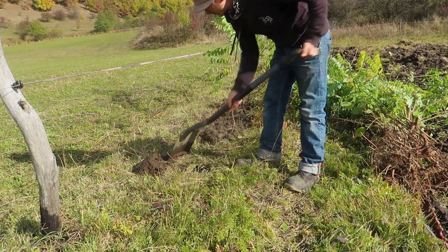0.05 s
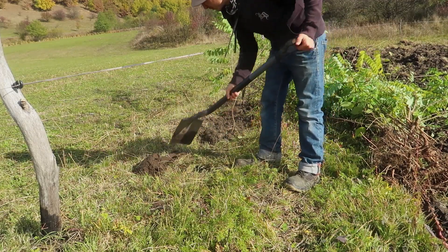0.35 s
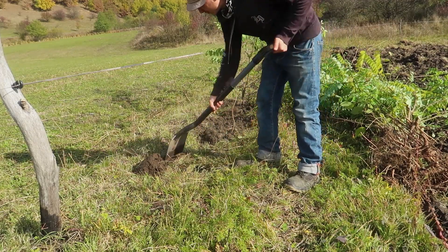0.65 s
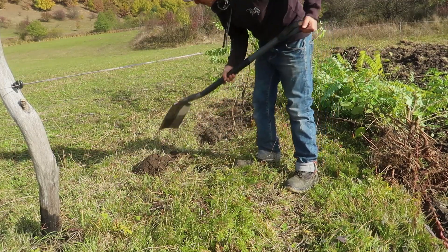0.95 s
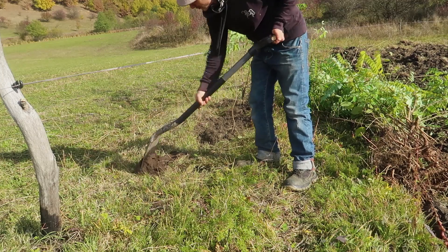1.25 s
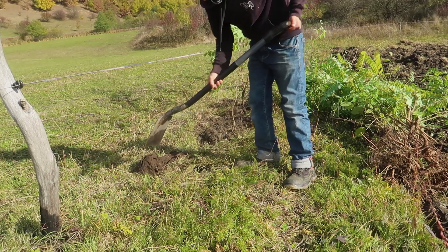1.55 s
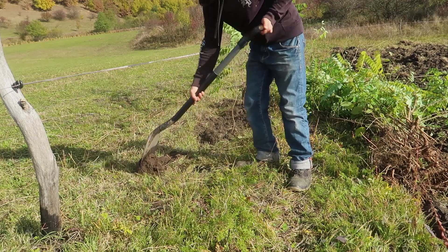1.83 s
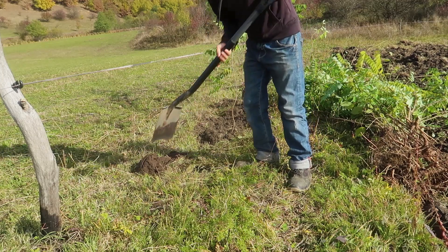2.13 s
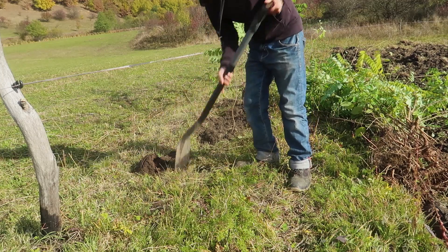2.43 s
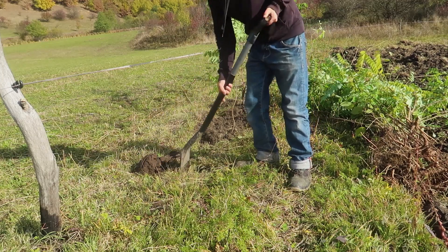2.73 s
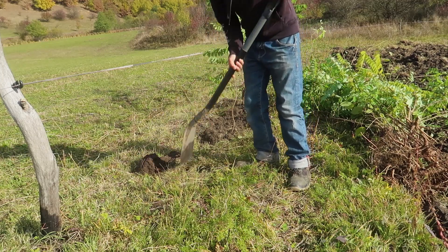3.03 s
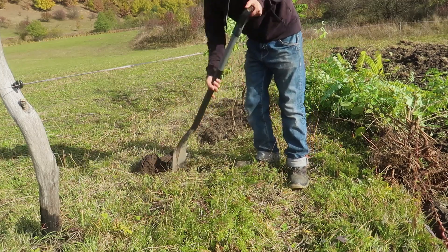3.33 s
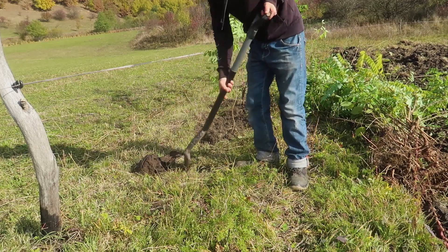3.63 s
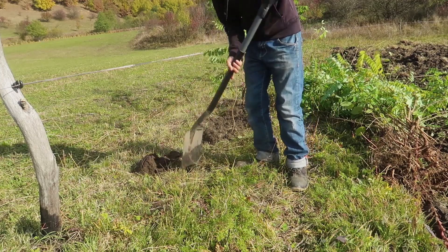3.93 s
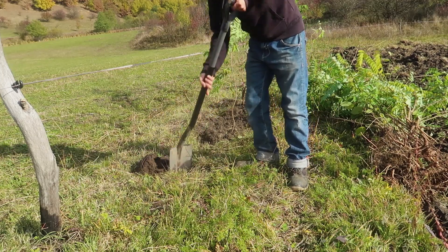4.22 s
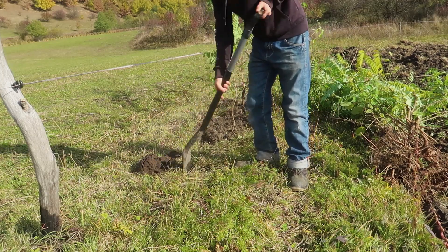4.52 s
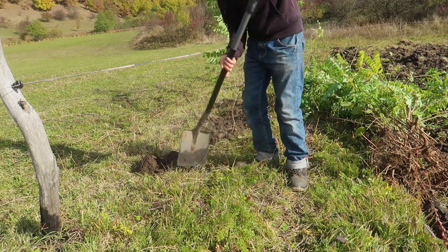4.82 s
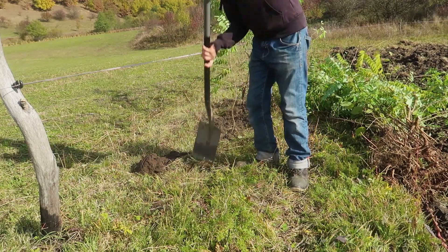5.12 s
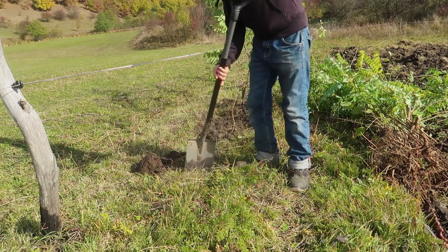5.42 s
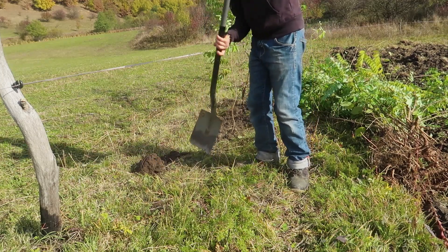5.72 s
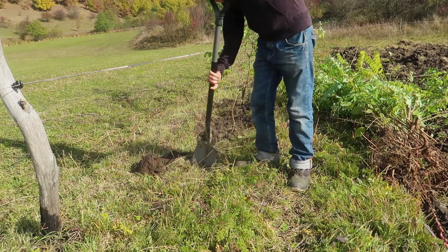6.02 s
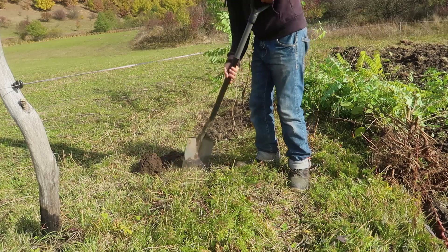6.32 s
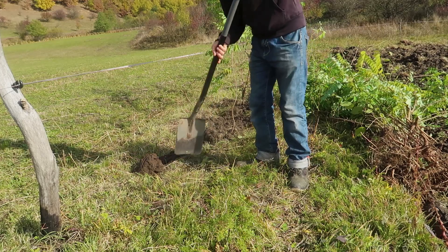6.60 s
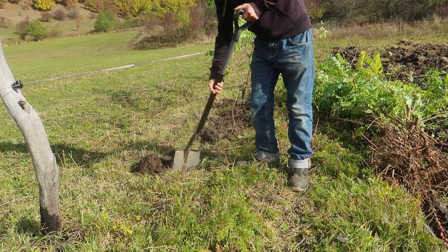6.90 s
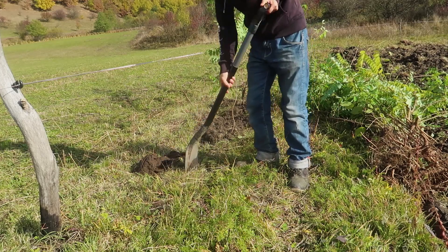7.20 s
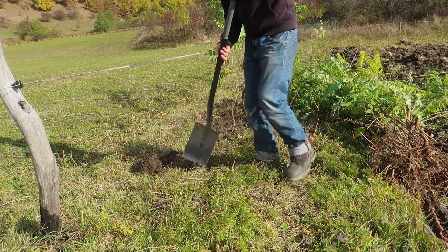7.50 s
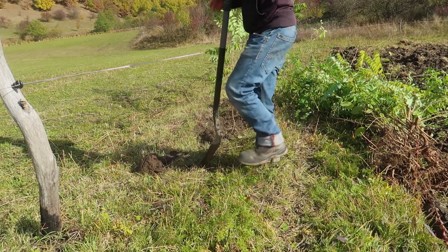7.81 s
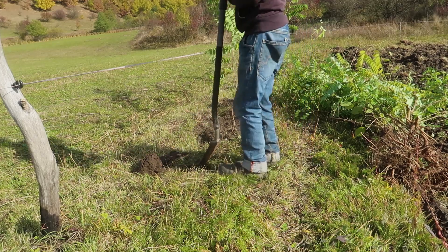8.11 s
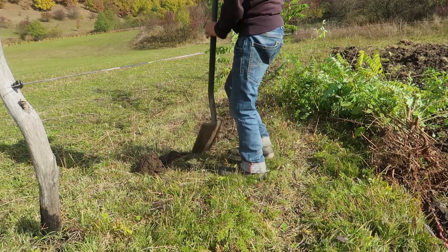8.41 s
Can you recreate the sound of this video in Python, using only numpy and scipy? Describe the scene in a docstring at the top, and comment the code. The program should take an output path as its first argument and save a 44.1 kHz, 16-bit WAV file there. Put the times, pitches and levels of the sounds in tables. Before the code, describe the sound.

A steel spade digs in an open field, a few metres away and near the centre, with almost no echo. Four short chops hit bare soil at about 0.2, 0.7, 1.3 and 1.9 seconds, each a gritty crunch with a dull thud and shaft knock, the first and third with sharp stone clicks. The blade scrapes and rings faintly as it withdraws. Slightly softer-edged cuts crunch into turf at about 2.6, 3.4, 4.3, 5.3, 6.0 and 6.8 seconds. Between them, roots and grass crackle quietly and stones tick on the steel, with one sharp clack near 4.7 seconds and a scatter of clicks just after 6. Two lighter cuts come at 7.8 and 8.1 seconds, followed by a small knock and faint tearing. Throughout, light wind rumbles on the microphone, gusting occasionally from 3 seconds, over a steady hiss and faint low hum.

```python
"""A steel spade chops into turf in an open field, a few metres from the microphone.
Each stroke thuds into the sod, knocks the shaft and crunches through roots and grit in tiny fractures;
stones click on the blade, which rings faintly as it is drawn out. The ground scatters a short tail.
Light wind rumbles on the microphone over a steady hiss and a faint hum."""
import sys
import numpy as np
from scipy import signal
from scipy.fft import rfft, irfft
from scipy.io import wavfile

SR = 44100
rng = np.random.default_rng(int(sys.argv[2]) if len(sys.argv) > 2 else 0)


def persist_wave(psi):
    """Save psi, clipped to +-1, as 16-bit WAV."""
    counts = np.round(np.clip(psi, -1, 1) * 32767).astype(np.int16)
    wavfile.write(sys.argv[1], SR, np.atleast_2d(counts).T)


N = 377055
SHORT = np.arange(8192) / SR   # time axis of one impulse response
HIT_GAIN = np.sqrt(SR / 200)   # turns an energy of one into an rms of one over 5 ms

# chops into bare soil: t/s, crunch/dB, hold/s, fall/s, thud/dB, thud f/Hz, shaft knock/dB
CHOPS = [(.178, -32.5, .025, 0.037, -23.5, 250, -28), (0.728, -42, .045, 0.015, -24, 176, -30),
         (1.326, -33.5, 0.0024, 0.071, -32, 283, -21), (1.854, -40, 0.026, 0.084, -32.5, 222, -32)]
# cuts into turf: t/s, crunch/dB, hold/s, fall/s, thud/dB
CUTS = [(2.568, -39.5, 0.038, 0.033, -41), (3.429, -38, 0.012, 0.044, -36),
        (4.335, -38, 0.0033, 0.062, -38.5), (5.281, -34, 0.018, 0.022, -33),
        (6.033, -35.5, 0.021, 0.039, -33), (6.827, -36, 0.026, .035, -26), (7.819, -46, .005, 0.036, -54),
        (8.078, -46, 0.0082, 0.097, -43.5)]
# roots and grass giving way: t/s, level/dB, length/s, tilt/(dB per octave)
TEARS = [(.77, -40, 0.026, -1), (2.82, -63, .36, 0), (3.47, -52, .08, 2), (3.67, -61, 0.31, 1),
         (4.53, -54.5, 0.31, -1.5), (4.8, -64, 0.26, -1), (5.43, -53, 0.25, -2.5),
         (5.66, -60.5, 0.13, -3.5), (6.21, -52.5, .27, -1.5), (7.08, -53, 0.12, -3.5),
         (8.11, -56, 0.29, -7.5), (8.25, -62.5, 0.39, 3)]
TEAR_SHAPE = (.2, .46, .46)   # proportions of rise, hold and fall
# modes of the blade held by soil: f/Hz, relative level/dB, t60/s
BURIED_BLADE = [(820, 4.5, 0.013), (960, 10, 0.0034), (1153, 2, 0.033), (1510, 3.5, 0.05),
                (2284, -5, 0.067), (2400, -0.5, 0.037), (2653, 4, 0.028), (2936, 6.5, 0.026),
                (3725, -1.5, 0.064), (4150, 0, 0.034), (4700, -4.5, 0.023), (5784, 1, 0.021),
                (7040, -14, 0.028)]


def spade_crunches():
    """The blade drives in: sudden in bare soil, swelling as it parts turf, thinner in a light cut."""
    # spectrum of crunching soil: f/Hz, relative level/dB
    soil_spectrum = [(50, 15.5), (130, 11), (300, 9), (600, 4), (900, 0), (1400, -2), (2000, -3),
                     (3000, -2.5), (4500, -6.5), (6500, -10.5), (10000, -16.5), (13000, -25.5),
                     (15500, -47)]
    chop_rise_s, chop_tilt_db, cut_rise_s = .005, 0.95, .029
    firm_cut_db, thinning = -33.5, 0.23   # dB per octave of tilt for each dB below a firm cut
    chops = [(s, db, chop_rise_s, hold, fall, chop_tilt_db) for s, db, hold, fall, *_ in CHOPS]
    cuts = [(s, db, cut_rise_s, hold, fall, thinning * (firm_cut_db - db))
            for s, db, hold, fall, _ in CUTS]
    return strokes(chops + cuts, soil_spectrum, BURIED_BLADE, ring_db=-9, detune=0.0098, curve=1.04,
                   per_s=3800, spread_db=2.0, smooth_db=-5.0, slips_per_s=370, slip_db=7.5)


def impacts():
    """Chops, cuts and jolts as blows: t/s, thud/dB, thud f/Hz, knock/dB, knock tilt/(dB per octave)."""
    # the buried spade catches and its shaft jolts: t/s, knock/dB
    catches = [(0.1969, -19.5), (3.517, -46), (6.842, -35), (6.983, -43), (8.243, -42.5)]
    turf_hz, jolt_hz, jolt_tilt_db = 148, 235, -1.5
    firm_knock_db, brightening = -29, 0.8   # dB per octave of tilt for each dB above a firm knock
    stops = [(s, thud_db, hz, knock_db) for s, *_, thud_db, hz, knock_db in CHOPS]
    stops += [(s, thud_db, turf_hz, thud_db - 4) for s, *_, thud_db in CUTS]
    jolts = [(s, knock_db - 21, jolt_hz, knock_db, jolt_tilt_db) for s, knock_db in catches]
    return [(*stop, brightening * (stop[-1] - firm_knock_db)) for stop in stops] + jolts


def spade_blows(thud_cycles, push_s, contact_s):
    """The sod takes each blow as a thud that dies by 60 dB in thud_cycles, while the shaft knocks."""
    # modes of the shaft: f/Hz, relative level/dB, t60/s
    shaft_modes = [(301, -2, 0.028), (459, -1, 0.042), (536, -3, 0.043), (720, -5, 0.038),
                   (1210, -2.5, 0.012), (1447, -4, 0.018), (2270, -12, 0.022), (3380, -13, 0.024)]
    out = np.zeros(N)
    contact = SHORT * np.exp(-SHORT / contact_s)
    push = 1 - np.exp(-SHORT / push_s)
    for s, thud_db, hz, knock_db, tilt_db in impacts():
        thud = np.sin(2 * np.pi * hz * SHORT) * decay(thud_cycles / hz) * push
        knock = through(ringing(shaft_modes, tilt_db, vary_db=1.0, detune=0.0016), contact)
        add(out, s, HIT_GAIN * (from_db(thud_db) * unit(thud) + from_db(knock_db) * unit(knock)))
    return out


def root_tears():
    """Roots and grass snap as the blade is levered or trodden."""
    # spectrum of snapping roots: f/Hz, relative level/dB
    snap_spectrum = [(100, -22), (350, 7.5), (800, -6.5), (1500, -1), (3200, 2), (6000, -5), (10000, -12),
                     (15500, -30)]
    tears = shaped(TEARS, TEAR_SHAPE)
    return strokes(tears, snap_spectrum, BURIED_BLADE, ring_db=-11, detune=0.028, curve=1.4,
                   per_s=550, spread_db=5.5, smooth_db=-0.5, slips_per_s=240, slip_db=3.5)


def blade_draws():
    """Drawn out, the blade skims the soil and rings freely."""
    # skims of the blade: t/s, level/dB, length/s, tilt/(dB per octave)
    skims = [(.351, -46, .05, -3.5), (.397, -52, 0.057, -6), (.93, -55.5, 0.085, -7),
             (1.565, -54.5, 0.098, -2.5), (2.085, -50.5, .17, -2), (4.955, -57, 0.14, -5.5),
             (6.42, -57.5, .12, -4), (7.505, -55, .18, -2), (7.822, -38.5, .016, 1.5)]
    # spectrum of steel sliding on soil: f/Hz, relative level/dB
    slide_spectrum = [(300, -9), (1200, -4.5), (2500, 2), (5000, 3.5), (9000, -3), (15500, -22)]
    # modes of the free blade: f/Hz, relative level/dB, t60/s
    free_blade = [(1425, 7.5, 0.039), (1795, -2, 0.29), (1980, -7, 0.12), (2260, -5, 0.076),
                  (2560, 11, 0.091), (2800, -5, 0.029), (2860, -26, 0.06), (3160, 1.5, 0.078),
                  (3750, 3, 0.027), (3980, 4, 0.026), (4600, -23, .04), (5230, -5, 0.041)]
    draws = shaped(skims, (.38, .04, .58))
    return strokes(draws, slide_spectrum, free_blade, ring_db=2, detune=0.0075, curve=2.46,
                   per_s=2800, spread_db=4.5, smooth_db=5.5, slips_per_s=180, slip_db=4.5)


def stone_clicks(skid_s, ring_db, ring_growth):
    """A stone skids over the steel for a moment; the harder the hit, the more the blade rings."""
    # stones striking the blade: t/s, level/dB, tilt/(dB per octave)
    stones = [(.178, -29, -2), (.189, -30.5, 4), (.197, -28.5, -1), (.7282, -37, -0.5), (.781, -43, -1),
              (1.324, -28, -1.5), (3.4143, -42.5, 11.5), (3.4393, -38.5, 3.5), (3.8233, -51.5, 5),
              (4.3347, -34.5, -7), (4.5001, -44, 1.5), (4.5626, -45, 0.5), (4.5871, -40, 0.5),
              (4.6515, -22, .5), (4.6735, -34.5, 0), (5.4965, -36.5, 1.5), (6.02, -41.5, 7),
              (6.042, -31, -3.5), (6.162, -46.5, 1), (6.174, -44, 1.5), (6.2157, -47, 2), (6.227, -44, 2),
              (6.316, -40, 1), (6.33, -41.5, -0.5), (6.396, -48.5, 3), (6.9826, -43.5, 0),
              (7.0827, -43, -3.5), (7.823, -43, 6)]
    # spectrum of a stone's crack: f/Hz, relative level/dB
    crack_spectrum = [(100, -19), (400, -4), (900, 6.5), (1400, 3.5), (2200, 3.5), (4200, -4), (6800, -7),
                      (9500, -18), (15500, -35)]
    out = np.zeros(N)
    hardest_db = max(db for _, db, _ in stones)
    for s, level_db, tilt_db in stones + grit(count=2, above_tear_db=4, top_db=-48.5, spread_db=2.5):
        ring = ringing(BURIED_BLADE, tilt_db, vary_db=3.5, detune=0.011)
        ring_gain = from_db(ring_db + ring_growth * (level_db - hardest_db))
        response = ring_gain * ring + colour(crack_spectrum, tilt_db)
        click = unit(signal.fftconvolve(skid(skid_s), response))
        add(out, s, HIT_GAIN * from_db(level_db) * click)
    return out


def grit(count, above_tear_db, top_db, spread_db):
    """Each tear flicks grains at the blade at random moments: t/s, level/dB, tilt/(dB per octave)."""
    ticks = []
    for s, tear_db, _, hold, _, tilt_db in shaped(TEARS, TEAR_SHAPE):
        mean_db = min(tear_db + above_tear_db, top_db)
        for _ in range(count):
            ticks.append((s + hold * rng.random(), mean_db + spread_db * rng.standard_normal(), tilt_db))
    return ticks


def skid(decay_s):
    """A brief chattering contact that excites all pitches about evenly; energy one."""
    chatter = rng.standard_normal(len(SHORT)) * np.exp(-SHORT / decay_s)
    flat_spectrum = np.exp(1j * np.angle(rfft(chatter)))
    return unit(irfft(flat_spectrum)[:len(SHORT) // 2])


def strokes(moves, spectrum, modes, ring_db, detune, curve, **texture):
    """Grains swell and fade with the blade's travel, sounding in the soil and ringing the steel."""
    out = np.zeros(N)
    ring_gain = from_db(ring_db)   # steel against soil
    for s, level_db, rise, hold, fall, tilt_db in moves:
        t = np.arange(-2 * rise, hold + 2 * fall, 1 / SR)
        away = np.maximum(-t / rise, 0) + np.maximum((t - hold) / fall, 0)
        envelope = from_db(level_db - 20 * away ** curve)   # 20 dB down after one rise or fall
        force = envelope * np.resize(grains(SR // 2, **texture), len(t))
        on_steel = force * np.resize(rng.choice([-1, 1], SR // 2), len(t))   # pushes on either face
        soil = signal.fftconvolve(force, colour(spectrum, tilt_db))
        steel = signal.fftconvolve(on_steel, ringing(modes, tilt_db, vary_db=3.5, detune=detune))
        add(out, s - 2 * rise, (soil + ring_gain * steel) / np.hypot(1, ring_gain))
    return out


def grains(size, per_s, spread_db, smooth_db, slips_per_s, slip_db):
    """Tiny fractures over smooth friction, bunched as the blade sticks and slips; rms one."""
    strength = from_db(spread_db * np.minimum(rng.exponential(1, size), 3))
    snaps = (rng.random(size) < per_s / SR) * strength * rng.choice([-1, 1], size)
    slips = np.interp(np.arange(size) * slips_per_s / SR, np.arange(size), rng.uniform(-0.4, 1, size))
    friction = from_db(smooth_db) * unit(rng.standard_normal(size))
    return np.sqrt(size) * unit((unit(snaps) + friction) * from_db(slip_db * slips))


def ringing(modes, tilt_db, vary_db, detune):
    """Decaying modes; strengths vary with the point of contact, pitches with the soil's grip."""
    hz, level_db, t60 = np.transpose(modes)[:, :, None]
    hz = hz * np.exp(detune * rng.standard_normal(hz.shape))
    level_db = level_db + tilt_db * np.log2(hz) + vary_db * rng.standard_normal(hz.shape)
    signs = (-1) ** np.arange(len(hz))[:, None]
    partials = signs * from_db(level_db) * decay(t60) * np.sin(2 * np.pi * hz * SHORT)
    return unit(np.sum(partials, axis=0))


def open_field(x, pan_db, scatter_db, scatter_t60, port_db, port_hz):
    """The ground scatters a short tail; in the treble the microphone's left port leads the right."""
    direct = x * from_db([[pan_db / 2], [-pan_db / 2]])
    tails = [unit(rng.standard_normal(len(SHORT)) * decay(scatter_t60)) for side in range(2)]
    scatter = np.array([through(x, tail) for tail in tails])
    treble = signal.sosfiltfilt(signal.butter(2, port_hz, "high", fs=SR, output="sos"), x)
    lead = from_db(port_db) * np.gradient(treble)   # a tiny lag between ports acts as a time derivative
    return direct + from_db(scatter_db) * scatter + lead * [[1], [-1]]


def wind(breeze_db):
    """Gusts buffet the microphone over a steady breeze, rumbling alike in both ports."""
    # gusts: t/s, level/dB, half length/s
    gusts = [(3.01, -44.5, 0.051), (3.766, -55.5, 0.29), (4.536, -46.5, 0.095), (6.275, -50.5, 0.27),
             (7.32, -51, 0.24), (8.02, -44.5, 0.15)]
    # spectrum of wind on the microphone: f/Hz, relative level/dB
    rumble_spectrum = [(12, -19), (25, 0.5), (42, -3), (60, -0.5), (85, -4.5), (125, -11.5), (170, -15),
                       (300, -32), (700, -47), (3000, -65)]
    t = np.arange(N) / SR
    swells = sum(from_db(db) * np.exp(-((t - s) / half) ** 2) for s, db, half in gusts)
    return (from_db(breeze_db) + swells) * through(rng.standard_normal(N), colour(rumble_spectrum))


def hiss(level_db):
    """Each port of the microphone has its own steady hiss."""
    # spectrum of the hiss: f/Hz, relative level/dB
    hiss_spectrum = [(60, -1.5), (180, 3), (340, 3), (500, 0), (800, -3.5), (1300, -5.5), (2500, -9),
                     (5000, -14), (8000, -20.5), (11000, -24.5), (13500, -30), (15500, -43)]
    response = colour(hiss_spectrum)
    return from_db(level_db) * np.array([through(noise, response) for noise in rng.standard_normal((2, N))])


def hum():
    """The camera hums faintly in a few steady low tones."""
    # tones of the hum: f/Hz, rms level/dB
    tones = [(120, -62), (180, -68.5), (240, -71), (299, -74), (360, -74)]
    t = np.arange(N) / SR
    return sum(np.sqrt(2) * from_db(db) * np.sin(2 * np.pi * (hz * t + rng.random())) for hz, db in tones)


def shaped(moves, shape):
    """Split each movement's length into rise, hold and fall in the proportions of shape."""
    shares = np.array(shape) / sum(shape)
    return [(s, level_db, *(length * shares), tilt_db) for s, level_db, length, tilt_db in moves]


def colour(spectrum, tilt_db=0):
    """Causal (minimum-phase) response with this spectrum, tilted per octave; energy one."""
    hz, level_db = np.transpose(spectrum)
    octave = np.log2(np.maximum(np.fft.rfftfreq(len(SHORT), 1 / SR), 1))
    curve_db = np.interp(octave, np.log2(hz), level_db) + tilt_db * np.maximum(octave, np.log2(hz[0]))
    cepstrum = irfft(np.log(from_db(curve_db)))
    cepstrum[1:] *= 2   # fold onto positive time
    cepstrum[len(SHORT) // 2:] = 0
    return unit(irfft(np.exp(rfft(cepstrum))))


def decay(t60):
    """An envelope that falls by 60 dB in t60 seconds."""
    return np.exp(-np.log(1000) * SHORT / t60)


def from_db(db):
    """Decibels to gain."""
    return 10 ** (np.asarray(db) / 20)


def unit(x):
    """Scale to an energy of one."""
    return x / np.sqrt(np.sum(x ** 2) + 1e-20)


def add(track, s, sound):
    """Mix a sound into the track from time s on."""
    start = round(s * SR)
    part = sound[max(-start, 0):max(N - start, 0)]
    track[max(start, 0):max(start, 0) + len(part)] += part


def through(x, response):
    """Pass a signal through an impulse response, keeping its length."""
    return signal.oaconvolve(x, response)[:len(x)]


def scene():
    """The spade works a few metres off, just left of centre, with wind, hiss and hum behind it."""
    spade = spade_crunches() + root_tears() + blade_draws()
    spade += spade_blows(thud_cycles=5.3, push_s=0.0021, contact_s=.00004)
    spade += stone_clicks(skid_s=.0017, ring_db=3.5, ring_growth=.3)
    placed = open_field(spade, pan_db=0.9, scatter_db=-20.5, scatter_t60=0.087, port_db=-2.5, port_hz=3800)
    return placed + wind(breeze_db=-53.0) + hiss(level_db=-54.5) + hum()


def record(dry):
    """The top is cut steeply above 15.6 kHz."""
    return signal.sosfilt(signal.ellip(10, .2, 80, 15600, fs=SR, output="sos"), dry)


dry = scene()
out = record(dry)
persist_wave(out)
```